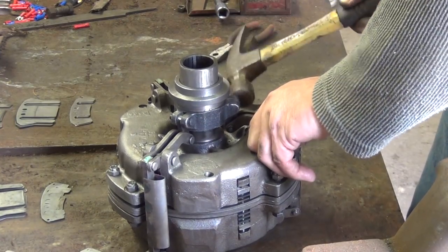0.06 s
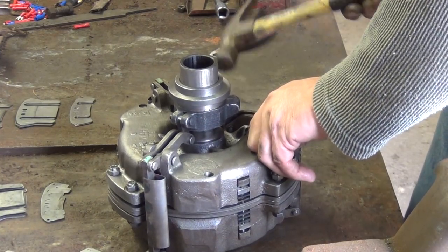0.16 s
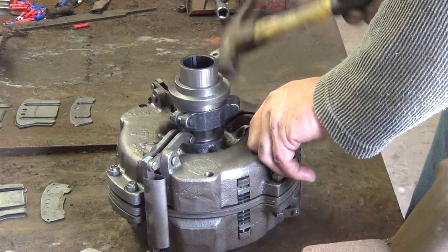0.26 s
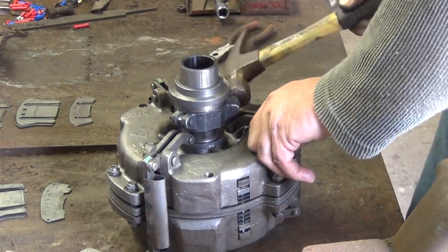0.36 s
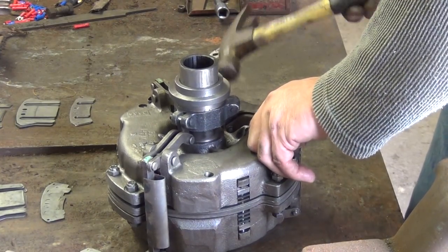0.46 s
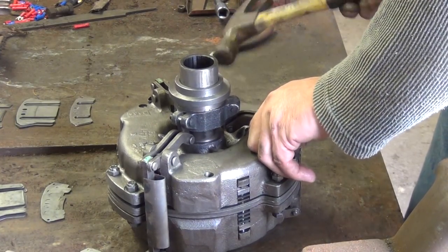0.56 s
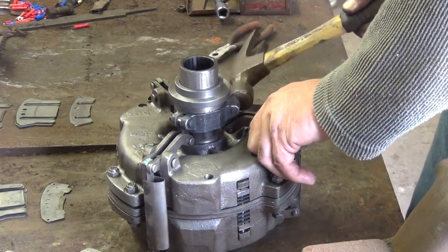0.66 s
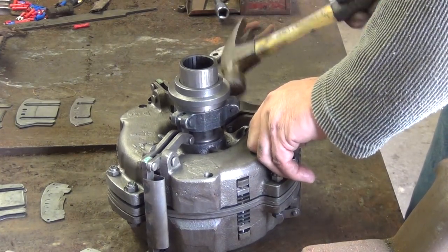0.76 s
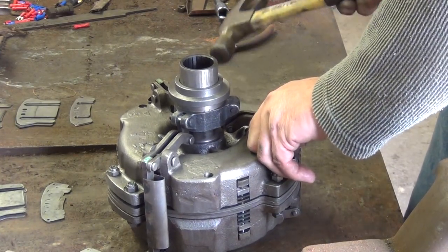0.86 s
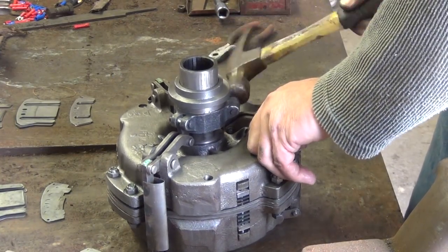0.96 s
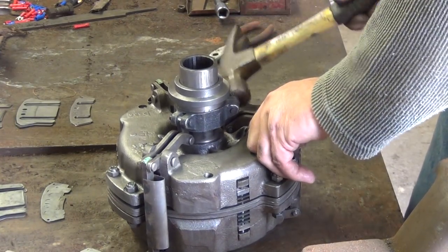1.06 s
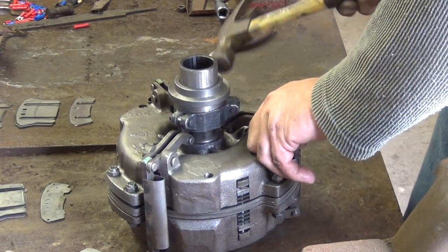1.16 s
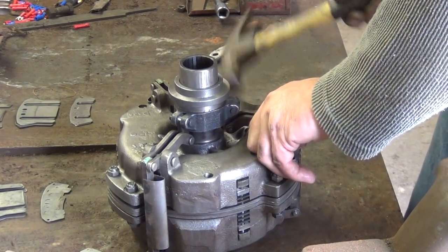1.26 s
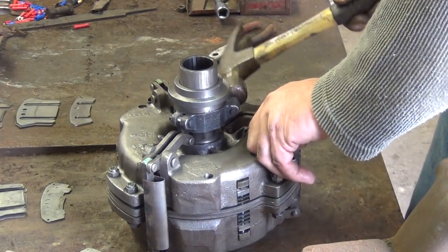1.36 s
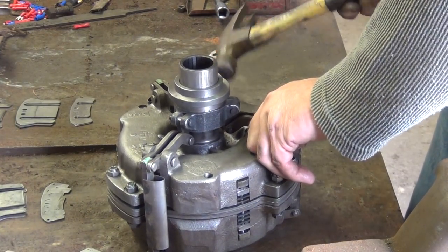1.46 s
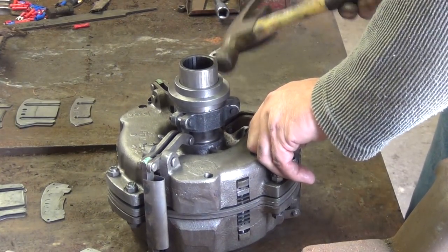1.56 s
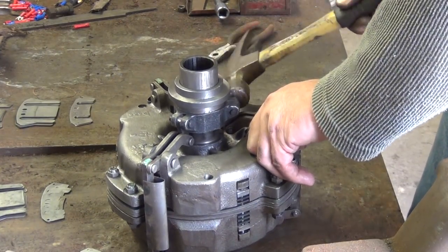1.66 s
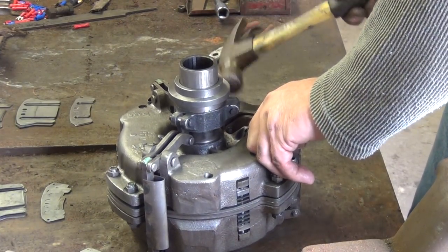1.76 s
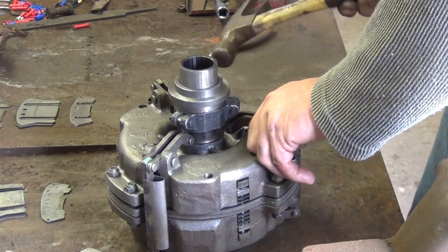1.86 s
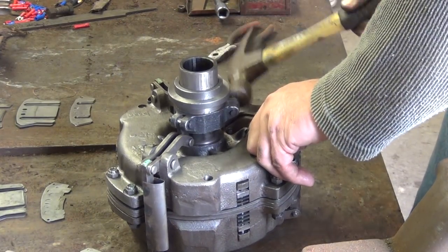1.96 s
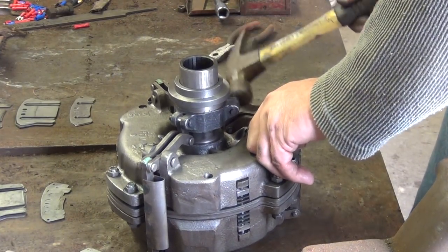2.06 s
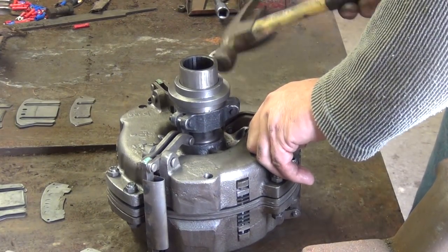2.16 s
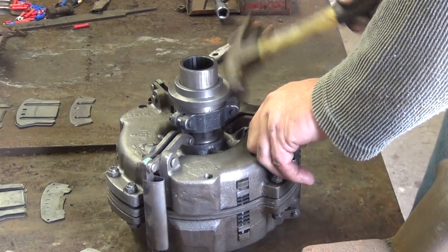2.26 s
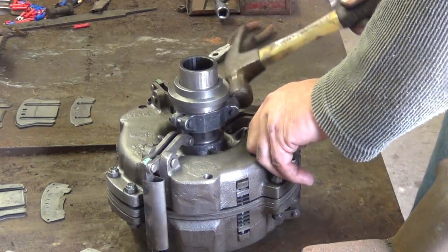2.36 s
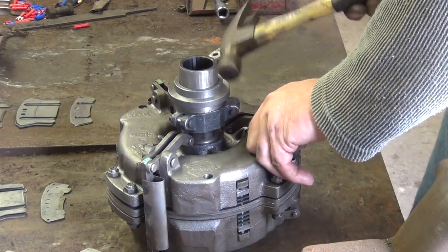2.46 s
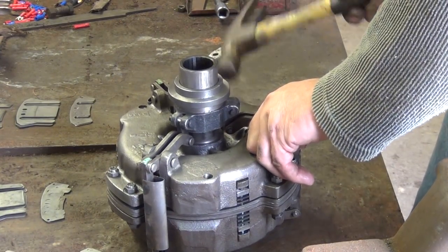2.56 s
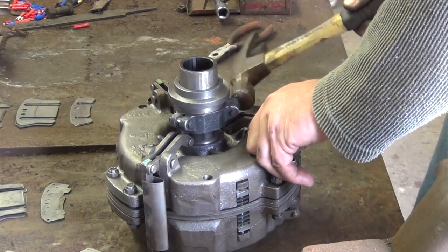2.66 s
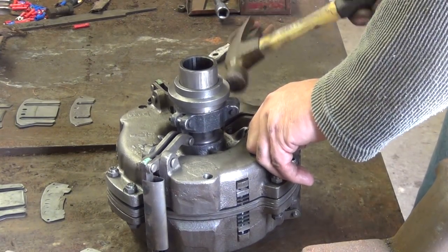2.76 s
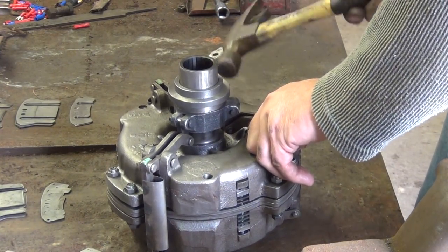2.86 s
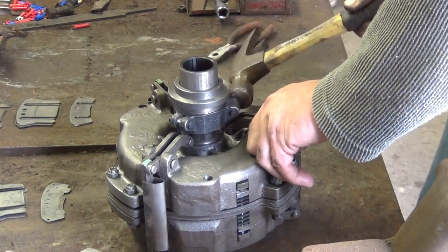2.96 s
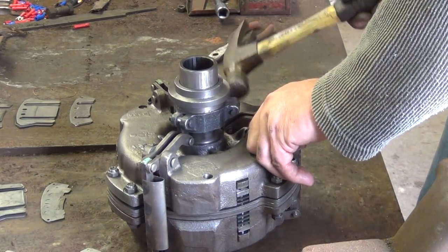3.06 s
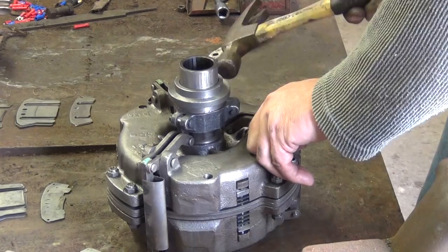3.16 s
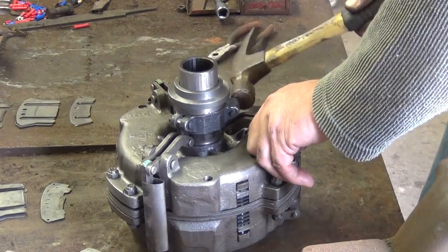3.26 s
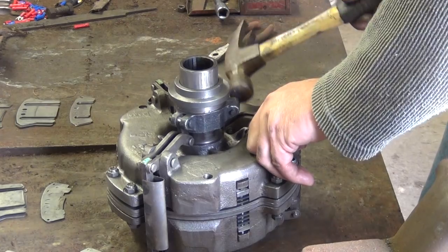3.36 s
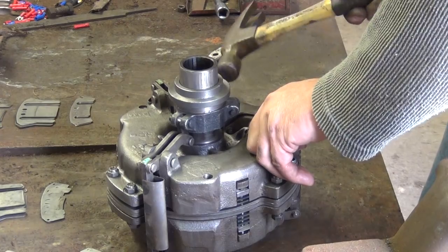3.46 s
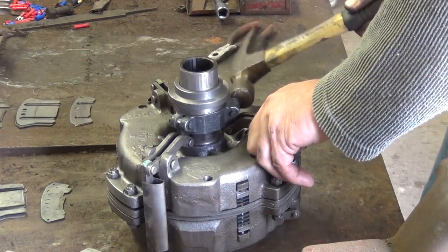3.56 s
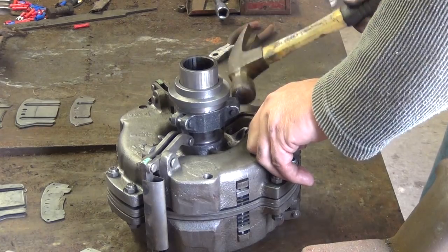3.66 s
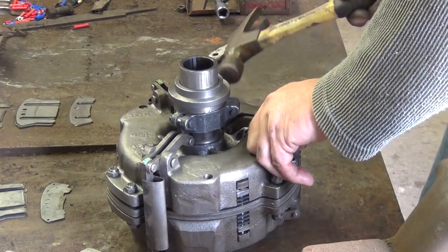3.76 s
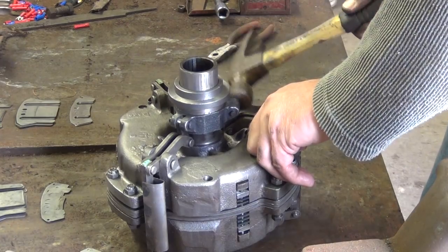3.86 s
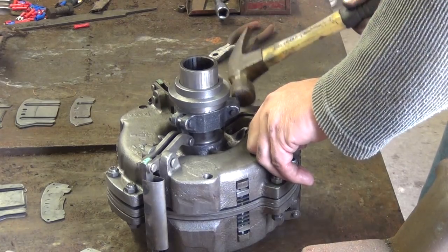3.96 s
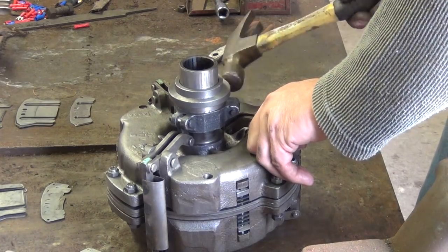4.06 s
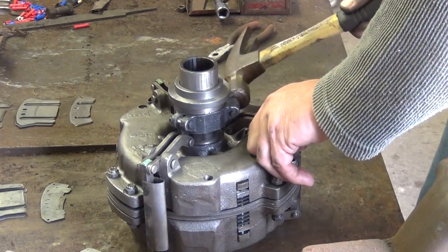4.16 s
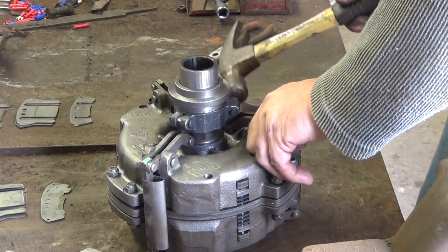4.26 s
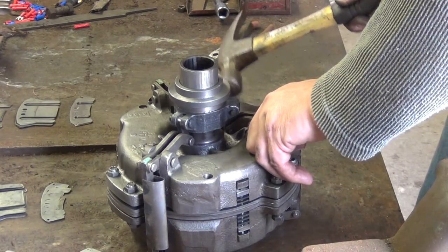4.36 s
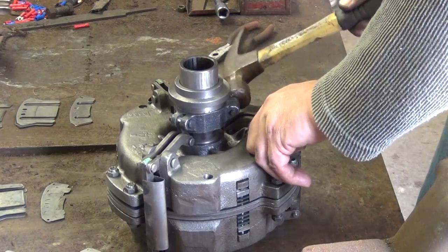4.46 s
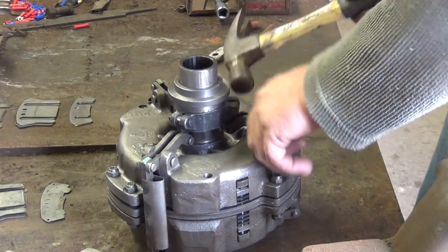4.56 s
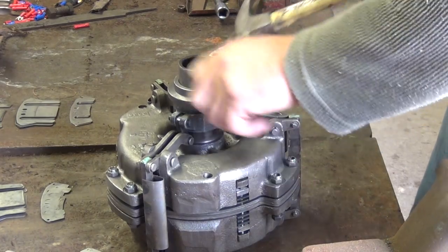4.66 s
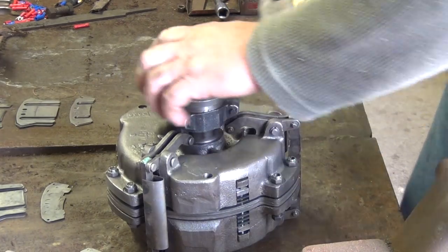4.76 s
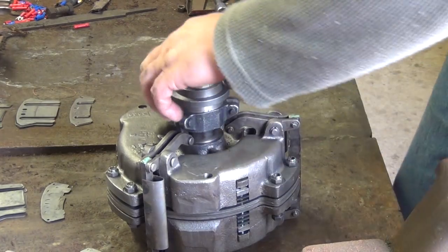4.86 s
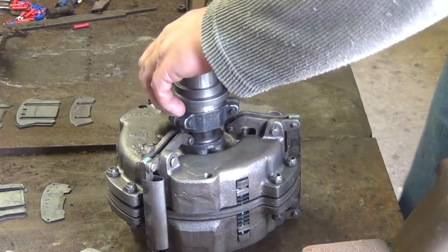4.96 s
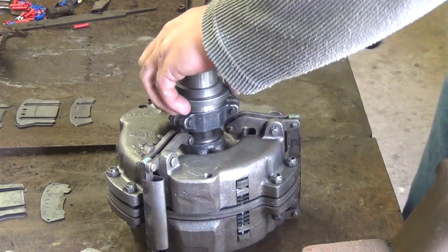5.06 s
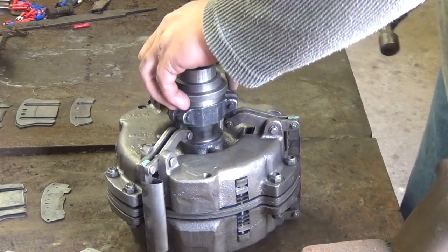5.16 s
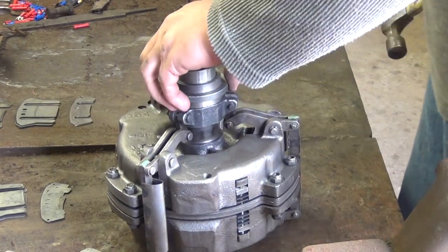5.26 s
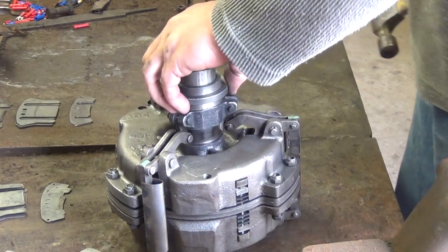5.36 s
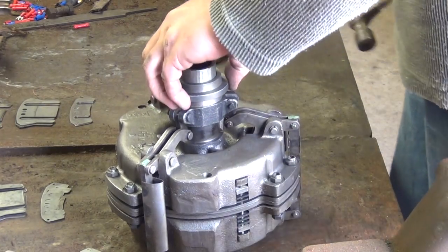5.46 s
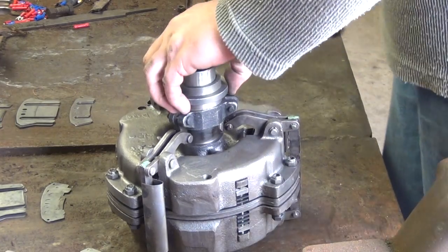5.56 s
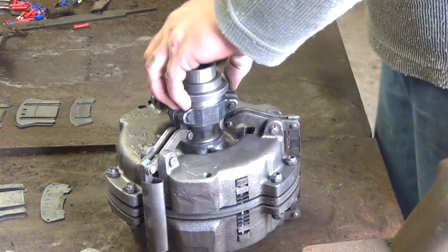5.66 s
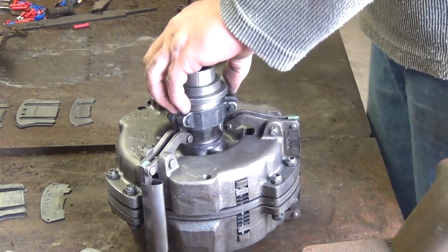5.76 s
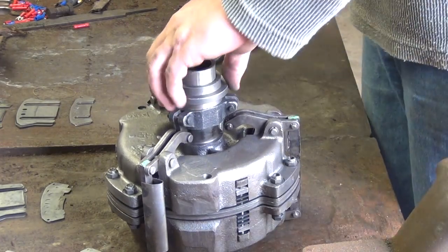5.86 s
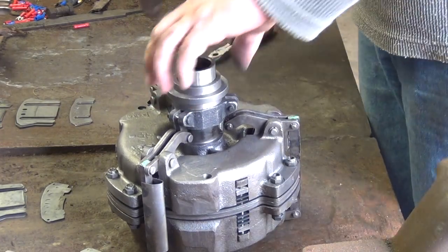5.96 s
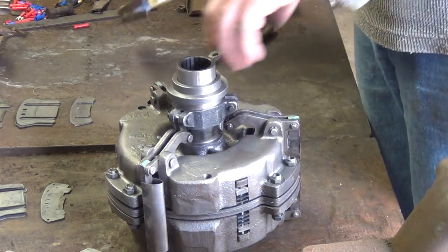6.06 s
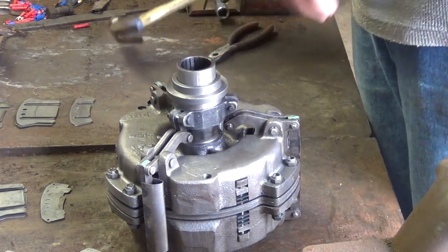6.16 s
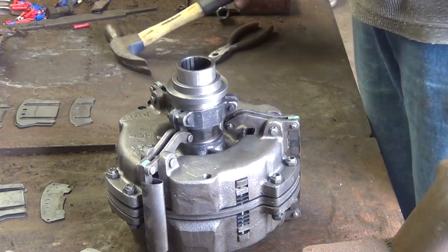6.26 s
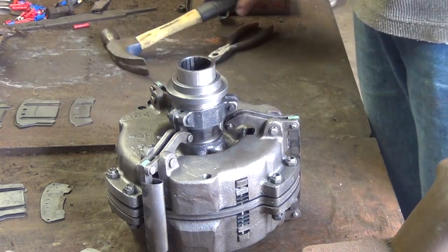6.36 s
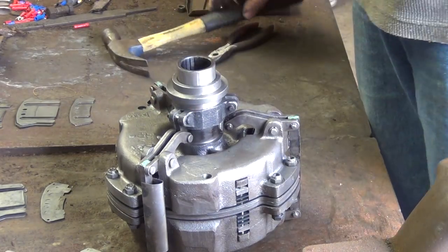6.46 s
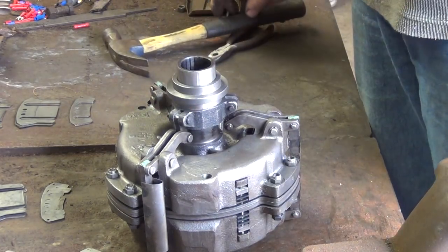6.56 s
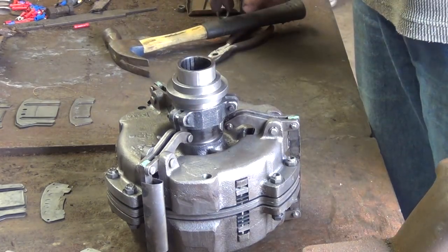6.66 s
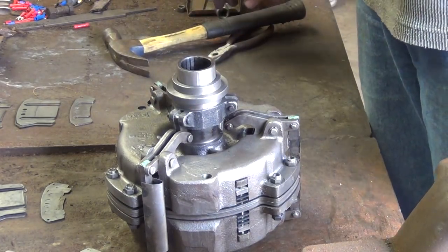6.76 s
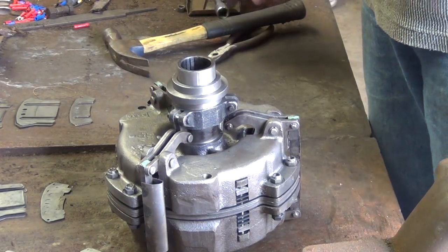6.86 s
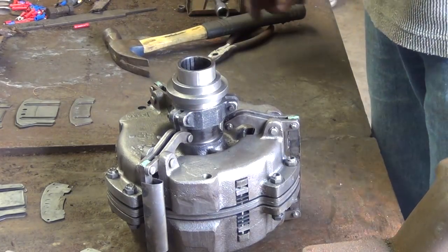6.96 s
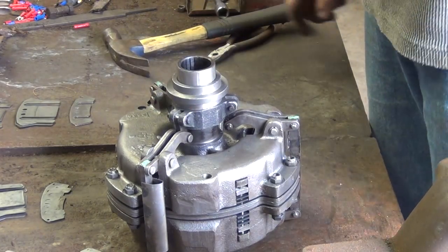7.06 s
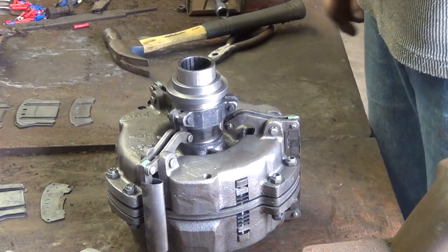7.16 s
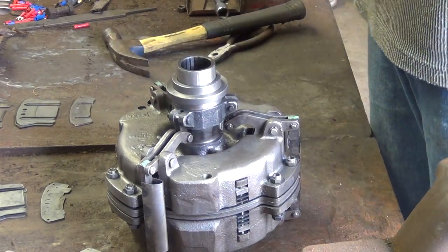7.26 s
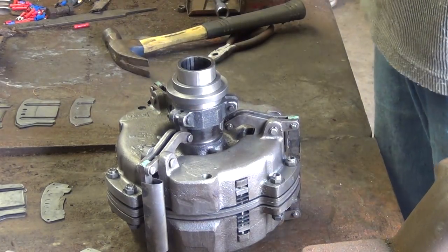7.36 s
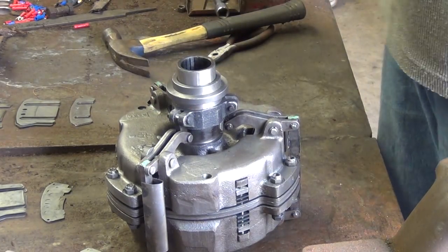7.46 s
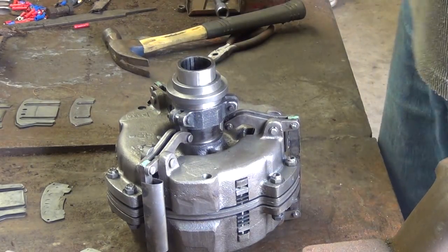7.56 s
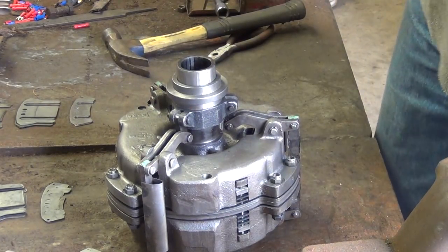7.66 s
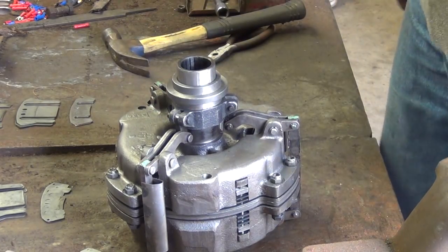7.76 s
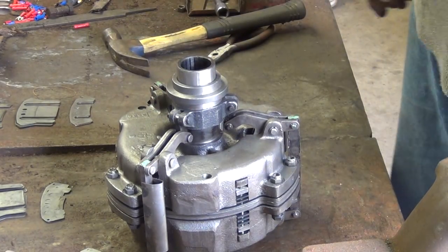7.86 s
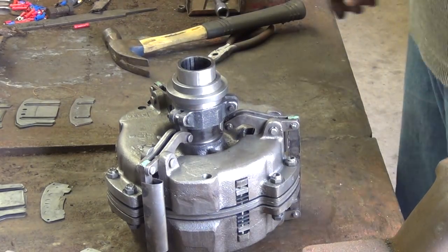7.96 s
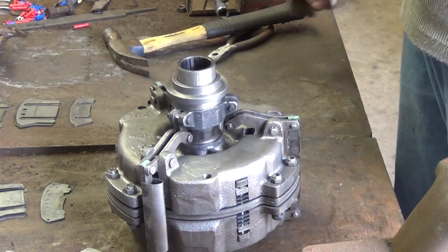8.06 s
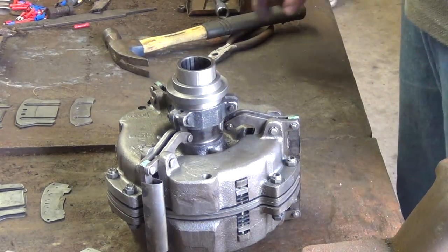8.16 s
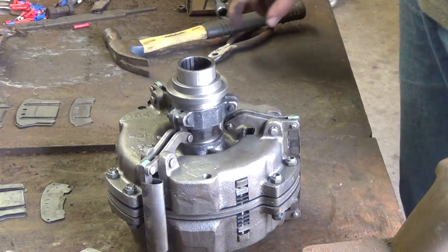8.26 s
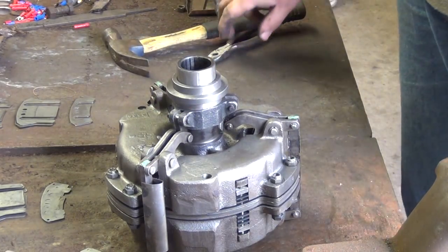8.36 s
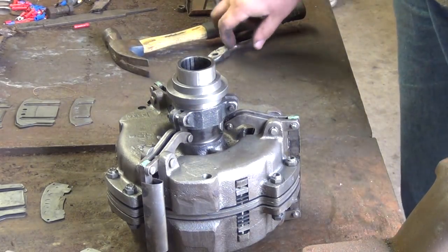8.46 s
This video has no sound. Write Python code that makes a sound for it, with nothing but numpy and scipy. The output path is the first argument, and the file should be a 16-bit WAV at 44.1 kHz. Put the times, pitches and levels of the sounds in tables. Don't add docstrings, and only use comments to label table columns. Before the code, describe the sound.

Near a steel bench in a reverberant, hard-walled workshop, a claw hammer is already tapping a heavy clutch assembly. From 0 to about 4.5 seconds come fifteen loud, even blows, roughly three a second, slightly quickening. Each is a bright, short double clank: hit, bounce about thirty milliseconds later, and a brief rattle of loose parts, with ringing castings and a low bench hum beneath. From about 2.6 seconds the taps sound tighter and more ringing, with stronger bounces; the last bounces weaken. The echo fades, and from 5 to 6.2 seconds a hand quietly rubs and ticks the bearing. At 6.3 the hammer clatters loudly onto the bench in several quick knocks, settling softly near 6.6. A light click and shoe scuff follow around 6.9 to 7.1, a fainter step at 7.9 and tiny tool clicks at 8.45. Steady room tone and hiss remain throughout.

```python
import sys
import numpy as np
from scipy import signal
from scipy.fft import rfft, irfft, next_fast_len
from scipy.io import wavfile

SR = 44100
rng = np.random.default_rng(int(sys.argv[2]) if len(sys.argv) > 2 else 0)


def master(y):
    cut = np.clip(np.atleast_2d(y).T, -1, 1)
    pcm = np.round(cut * 32767)
    wavfile.write(sys.argv[1], SR, pcm.astype(np.int16))


def invert_db(x):
    u = np.asarray(x, float) / 20
    return 10 ** u


N = 375732

# t/s, peak/dB, first rebound re blow/dB, drop-back delay/s, drop-back re blow/dB
BLOWS = [(0.006, -9, -17, 0.033, -2), (0.3388, -9.5, -8.5, .032, -2.5), (0.6726, -10.5, -4.5, .0305, -0.5),
         (1.0085, -9, -13.5, 0.03, -1), (1.3313, -8.5, -5.5, 0.03, -3.5), (1.661, -8.5, -9, 0.027, -4),
         (1.9947, -10.5, -10.5, 0.032, -1.5), (2.3274, -10.5, -6.5, 0.031, 0),
         (2.6504, -9, -0.5, 0.028, 1.5), (2.9735, -8.5, -2, 0.028, 0.5), (3.2867, -10.5, 3, .025, 2),
         (3.5945, -8, -2, 0.026, -2), (3.9019, -9, -1.5, 0.029, -1.5), (4.1849, -9.5, -1.5, 0.033, -7.5),
         (4.4457, -11, -4, 0.034, -18.5)]
# f/Hz, density/dB per Hz
BENCH = [(24, -72), (40, -40), (276, -31.5), (312, -14.5), (600, -5.5), (715, -1.5), (942, -11), (1150, -1),
         (1950, 1), (3930, -16), (9220, -48.5), (16000, -57)]
# f/Hz, side minus mid/dB
SHOP_SIDE = [(60, -6), (110, -24), (200, -31), (380, -26), (700, -17), (1290, -15.5), (2380, -9.5),
             (4400, -6.5), (8120, -5), (15000, -14)]
EDGES_HZ = 28 * 2 ** np.arange(0, 9.4, 1 / 3)


def at_hz(points, hz):
    table_hz, value = np.transpose(points)
    return np.interp(np.log(hz), np.log(table_hz), value)


def bands():
    for low, high in zip(EDGES_HZ, EDGES_HZ[1:]):
        yield np.sqrt(low * high), signal.butter(2, [low, high], "band", fs=SR, output="sos")


def train(times, sizes, size):
    out = np.full(size, 1e-18)
    np.add.at(out, np.round(times * SR).astype(int), sizes)
    return out


def decaying(clicks, t60):
    return signal.lfilter([1], [1, -invert_db(-60 / (t60 * SR))], clicks)


def ring(clicks, hz, t60):
    r, w = invert_db(-60 / (t60 * SR)), 2 * np.pi * hz / SR
    return signal.lfilter([0, np.sin(w)], [1, -2 * r * np.cos(w), r * r], clicks)


def top_cut(x, hz):
    return signal.sosfilt(signal.ellip(8, .5, 50, hz, fs=SR, output="sos"), x)


def struck(events, spectrum, crack_t60, crack_db, body, body_db):
    # f/Hz, level/dB, t60/s
    head = [(1630, -11, .35), (6030, -12, 0.1), (6950, -16, 0.1), (9570, -24, 0.08), (10450, -19, 0.04),
            (14700, -24, 0.05)]
    bass_cut_hz = 145
    s, peak_db, tilt, head_db, treble = np.transpose(events)
    first = int(s.min() * SR) - 1
    n = min(N - first, int((np.ptp(s) + 1) * SR))
    s = s - first / SR
    white = rng.standard_normal((2, n))
    out = np.zeros(n)
    luck = rng.normal(0, 1, (len(s), 60))

    def slope(hz):
        return (treble if hz > 2000 else tilt) * np.log2(hz / 2000)

    for k, (hz, sos) in enumerate(bands()):
        size = invert_db(peak_db + crack_db + at_hz(spectrum, hz) + slope(hz) + luck[:, k])
        lasts = crack_t60 * (2000 / hz) ** 0.24
        dying = decaying(train(s, size, n), lasts)
        out += signal.sosfilt(sos, dying * white[k % 2])
    for k, (hz, db, t60) in enumerate(body):
        size = invert_db(peak_db + body_db + db + slope(hz) + 2.5 * luck[:, 30 + k])
        out += ring(train(s, size, n), hz, t60)
    for k, (hz, db, t60) in enumerate(head):
        size = invert_db(peak_db + head_db + db + 2.5 * luck[:, 50 + k])
        out += ring(train(s, size, n), hz, t60)
    out = signal.sosfilt(signal.butter(3, bass_cut_hz, "high", fs=SR, output="sos"), out)
    return np.pad(out, (first, N - first - n))


def contacts():
    # t/s, narrowing/dB per octave, hammer ring/dB
    seating = [(0, -0.5, -26), (2.4, 1, -16), (2.6, 4, -17), (4.0, 4.5, -13), (4.3, 7.5, -16)]
    rebound_s, rebound_loss_db, rebound_dull_db = .0172, 7.5, 2.5
    rattles, rattle_s, rattle_db, rattle_fade_db = 8, .09, -9.5, 6
    treble_share = -0.091
    drop_dull_db = 1
    s, db, rebound_db, delay, back_db = np.transpose(BLOWS)
    late = rng.random((len(s), rattles))
    chatter_s = s[:, None] + .004 + rattle_s * late
    when = np.concatenate([s, s + delay, s + rebound_s, s + delay + rebound_s, chatter_s.ravel()])
    chatter_db = (db + np.minimum(back_db, 0))[:, None] + rattle_db - rattle_fade_db * late
    second_db = db + back_db - rebound_loss_db
    level = np.concatenate([db, db + back_db, db + rebound_db, second_db, chatter_db.ravel()])
    at, narrow, ring_db = np.transpose(seating)
    narrow = np.interp(when, at, narrow)
    kind = np.arange(len(when)) // len(s)
    treble = treble_share * narrow
    treble = treble - rebound_dull_db * ((kind == 2) | (kind == 3))
    treble = treble - drop_dull_db * ((kind == 1) | (kind > 3))
    return np.transpose([when, level, narrow, np.interp(when, at, ring_db), treble])


def clutch_taps(blows):
    # f/Hz, density/dB per Hz
    clutch = [(40, -37), (220, -32), (297, -16.5), (542, -15), (770, -13), (1280, -2.5), (1700, -0.5),
              (3140, -2), (7000, -9), (8990, -14), (9940, -12.5), (13400, -22.5), (14800, -21),
              (16000, -47)]
    # f/Hz, level/dB, t60/s
    casting = [(716, -3, 0.13), (1297, -11, 0.12), (1370, -8, 0.13), (1540, -37, .08), (1633, -3.5, 0.12),
               (1830, -21, 0.22), (2100, -41, 0.067), (2450, -13, 0.17), (2780, -22, 0.17),
               (3240, -5, 0.12), (3890, -11, 0.1), (4140, -8, 0.096), (4820, 1, 0.068)]
    taps = struck(blows, clutch, crack_t60=0.027, crack_db=7.5, body=casting, body_db=-27)
    return top_cut(taps, 15700)


def thuds(blows):
    # t/s, level/dB
    jolts = [
        (6.292, -4),
        (6.59, -12),
        (7.097, -24),
        (7.87, -22),
    ]
    thud_hz, thud_db, thud_t60_s, swell_hz = 129, -48.5, 0.57, 8.1
    seating_db = 3
    s, db, narrow = blows[:len(BLOWS), :3].T
    hits = np.transpose([s, db - seating_db * narrow])
    s, db = np.vstack([hits, jolts]).T
    shape = decaying(train(s, invert_db(db + thud_db), N), thud_t60_s)
    shape = signal.sosfilt(signal.butter(1, swell_hz, fs=SR, output="sos"), shape)
    sos = signal.butter(2, [thud_hz / 1.24, thud_hz * 1.47], "band", fs=SR, output="sos")
    hum = signal.sosfilt(sos, rng.standard_normal(N))
    return shape * hum / np.std(hum)


def hammer_laid():
    # t/s, peak/dB, brightness/dB per octave, ring/dB
    touches = [(6.292, -8, 1.5, -45), (6.307, -11, 1.5, -45), (6.323, -19, -0.5, -43),
               (6.343, -16.5, -0.5, -43), (6.391, -11.5, 3, -45), (6.4, -11.5, 3.5, -45),
               (6.42, -19.5, 3, -45), (6.575, -37, 21, -43), (6.59, -26, -4, -45),
               (6.604, -31.5, -3.5, -43), (6.641, -43, 15, -45)]
    # f/Hz, level/dB, t60/s
    plate = [(324, -16, 0.2), (722, -5.5, 0.25), (1180, -7, .1), (1470, -4, 0.16), (1910, -0.5, 0.11),
             (4630, -2.5, 0.02)]
    events = [(*row, row[2]) for row in touches]
    return struck(events, BENCH, crack_t60=0.062, crack_db=9.5, body=plate, body_db=-19)


def small_knocks():
    # t/s, peak/dB, brightness/dB per octave
    touches = [(5.164, -34, -4.5), (5.176, -32, -1), (5.187, -29.5, -2), (5.34, -47, -2), (5.479, -28.5, 2),
               (5.547, -51, -6), (5.63, -42.5, -6), (5.695, -39.5, -2), (5.734, -43, 5), (5.797, -31, -1),
               (5.916, -41, 14), (6.031, -34.5, 3), (6.217, -47.5, 20), (6.903, -47, 6.5),
               (6.945, -31, -0.5), (6.954, -33.5, 2), (6.962, -37, -4.5), (7.097, -35.5, -7.5),
               (7.119, -30, 2), (7.458, -50, 6), (7.87, -44.5, -7), (8.451, -38.5, 3), (8.463, -42, 3),
               (8.481, -39, 2)]
    # f/Hz, level/dB, t60/s
    bearing = [(330, -10, 0.11), (703, -6, 0.15), (1240, -5, 0.044), (1790, 5.5, 0.098), (1940, -6.5, 0.13),
               (2597, -4.5, 0.14), (3235, -1.5, 0.062)]
    events = [(*row, -50, row[2]) for row in touches]
    return struck(events, BENCH, crack_t60=0.026, crack_db=7, body=bearing, body_db=-17.5)


def rubbing():
    # peak t/s, level/dB, swell/s, fade/s, brightness/dB per octave
    moves = [(5.085, -52, 0.091, 0.054, 1), (5.18, -41.5, .03, 0.045, -2), (5.35, -52, 0.026, 0.041, -7),
             (5.485, -52, .004, 0.027, -2), (5.58, -57, 0.06, 0.18, -5.5), (5.8, -47.5, 0.15, 0.045, -2),
             (5.955, -45.5, 0.32, 0.5, .5), (6.23, -54, 0.033, 0.079, 4), (6.93, -48, 0.36, 0.038, 0),
             (6.948, -37.5, .004, 0.089, 2), (7.121, -32.5, 0.057, 0.054, -0.5),
             (7.719, -58.5, 0.083, 0.1, 7), (7.878, -47, .01, 0.44, 1.5), (8.46, -56, 0.24, 0.54, 2)]
    # f/Hz, density/dB per Hz
    colour = [(59, -38), (100, -25), (304, -9), (942, -3), (1500, -1), (1880, 2), (2400, -1), (4090, -5),
              (7670, -11.5), (13500, -30), (15000, -55)]
    stroke_range_db = 29.5
    first = int((moves[0][0] - .5) * SR)
    t = np.arange(first, N) / SR
    shape = (2, len(t))
    grains = invert_db(2.1 * rng.exponential(1, shape)) * rng.standard_normal(shape)
    grains = grains * (rng.random(shape) < .15)
    s, db, swell, fade, slope = np.transpose(moves)[:, :, None]
    strokes = invert_db(db - stroke_range_db * np.maximum((s - t) / swell, (t - s) / fade)) + 1e-12
    level = strokes.sum(0)
    tilt = (strokes * slope).sum(0) / level
    plain, tilted = 0, 0
    for k, (hz, sos) in enumerate(bands()):
        layer = invert_db(at_hz(colour, hz)) * signal.sosfilt(sos, grains[k % 2])
        plain = plain + layer
        tilted = tilted + invert_db(tilt * np.log2(hz / 2000)) * layer
    return np.pad(level / np.std(plain) * tilted, (first, 0))


def left_right(mid, side):
    return np.array([mid + side, mid - side])


def workshop(x):
    # f/Hz, t60/s
    shop_t60 = [(100, 0.68), (300, 0.68), (800, 0.7), (2000, 0.67), (5000, 0.53), (12000, 0.28),
                (15000, .16)]
    t = np.arange(int(.8 * SR)) / SR
    white = rng.standard_normal((2, 2, len(t)))
    answer = 0
    for k, (hz, sos) in enumerate(bands()):
        decay = invert_db(-60 * t / np.clip(at_hz(shop_t60, hz), .1, 2))
        width = invert_db([[0], [at_hz(SHOP_SIDE, hz)]])
        answer = answer + signal.sosfilt(sos, white[k % 2]) * decay * width
    build_up = np.clip((t - .004) / 0.0055, 0, 1)
    answer = answer * build_up / np.sqrt(np.sum(answer[0] ** 2))
    mid, side = signal.fftconvolve(x[None], answer, axes=1)[:, :N]
    return left_right(mid, side)


def air():
    # f/Hz, level/dB
    tone = [(15, -47), (25, -16), (271, -2), (673, 7), (1460, 7), (3500, -1), (7090, -11), (13500, -16.5)]
    air_db = -58.5
    size = next_fast_len(N)
    hz = np.arange(size // 2 + 1) * SR / size + 1
    colour = invert_db(at_hz(tone, hz) + np.array([0 * hz, at_hz(SHOP_SIDE, hz) + 3]))
    out = irfft(rfft(rng.standard_normal((2, size))) * colour, size)[:, :N]
    mid, side = invert_db(air_db) * out / np.std(out[0])
    return left_right(mid, side)


def scene():
    hiss_top_hz = 14000
    blows = contacts()
    taps = clutch_taps(blows)
    hum = thuds(blows)
    laid = hammer_laid()
    knocks = small_knocks()
    rubs = rubbing()
    a_little_left, a_little_right = invert_db([[.1], [-.1]]), invert_db([[-.4], [.4]])
    faint = laid * a_little_left + (knocks + invert_db(-3) * rubs) * a_little_right + air()
    wet = top_cut(invert_db(-8.5) * laid + invert_db(-9.5) * knocks + invert_db(-11) * rubs, hiss_top_hz)
    room = workshop(invert_db(-4) * taps + wet)
    return taps * a_little_left + hum + room + top_cut(faint, hiss_top_hz)


def band_limit(x):
    return signal.sosfilt(signal.butter(12, 16810, fs=SR, output="sos"), x)


def record(dry):
    mix = 0.66 * np.tanh(dry / 0.73)
    return band_limit(mix)


dry = scene()
out = record(dry)
master(out)
```